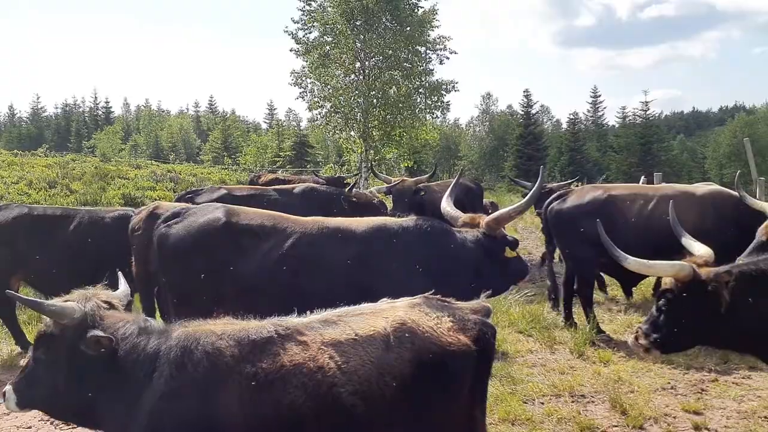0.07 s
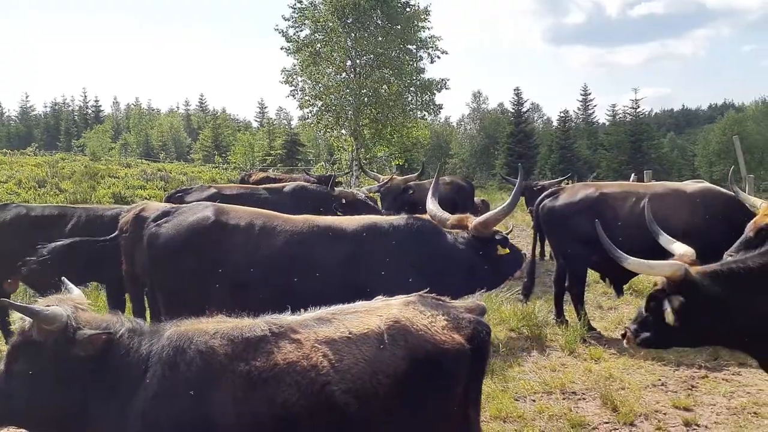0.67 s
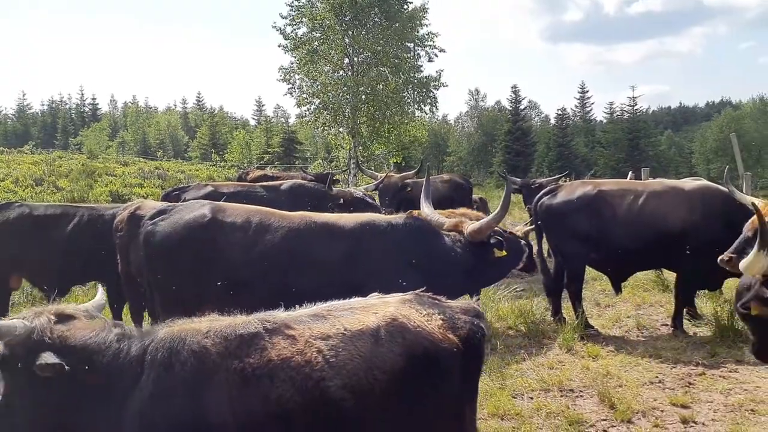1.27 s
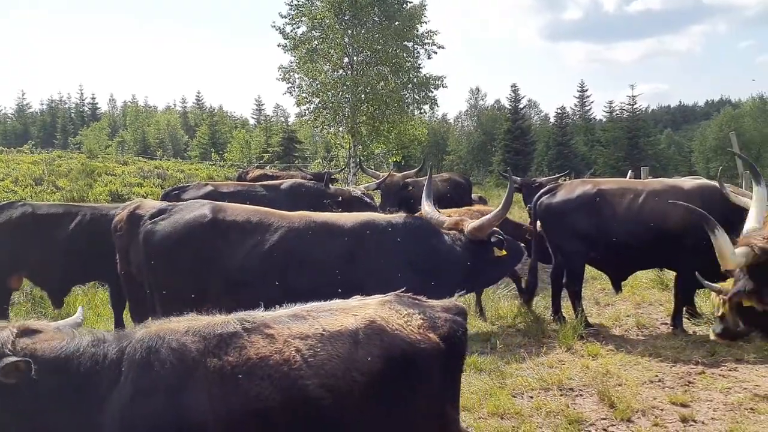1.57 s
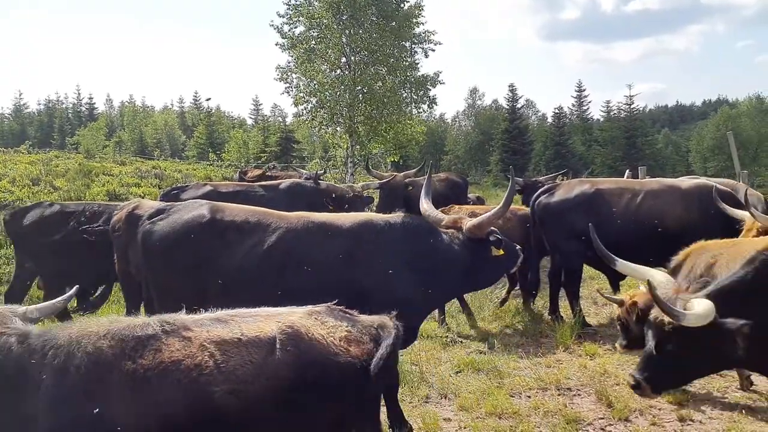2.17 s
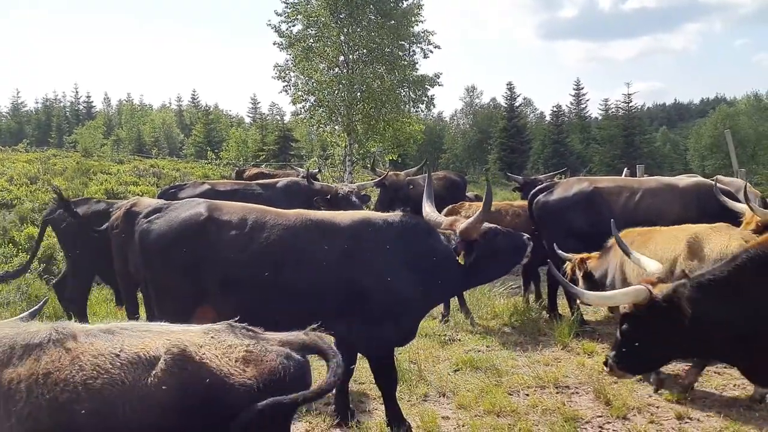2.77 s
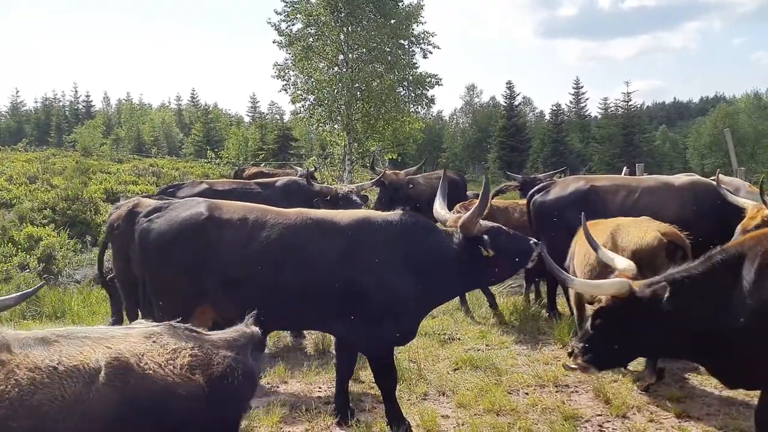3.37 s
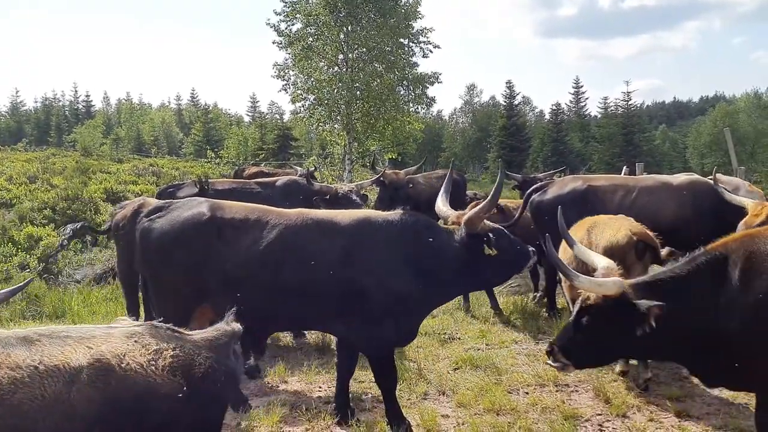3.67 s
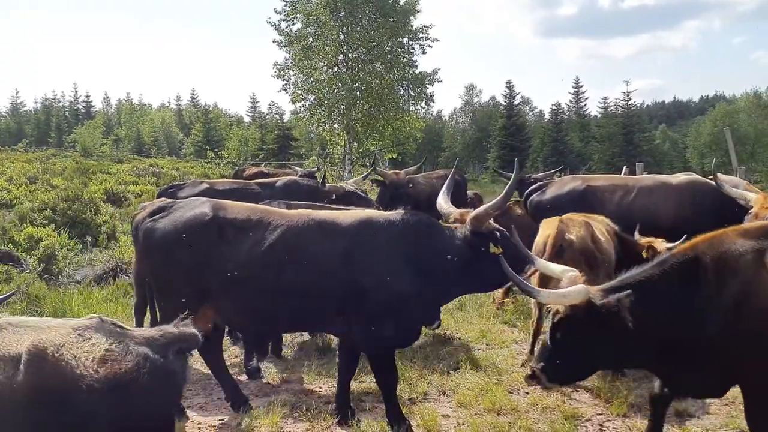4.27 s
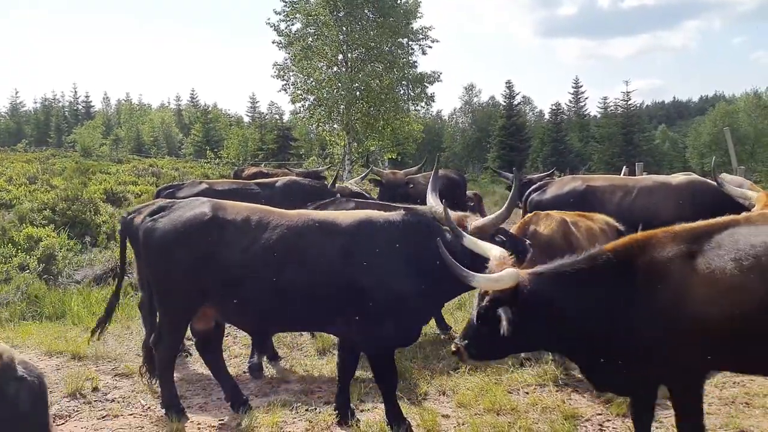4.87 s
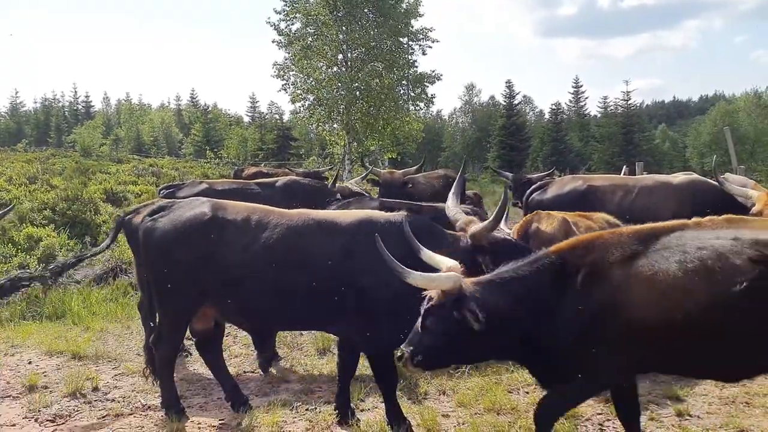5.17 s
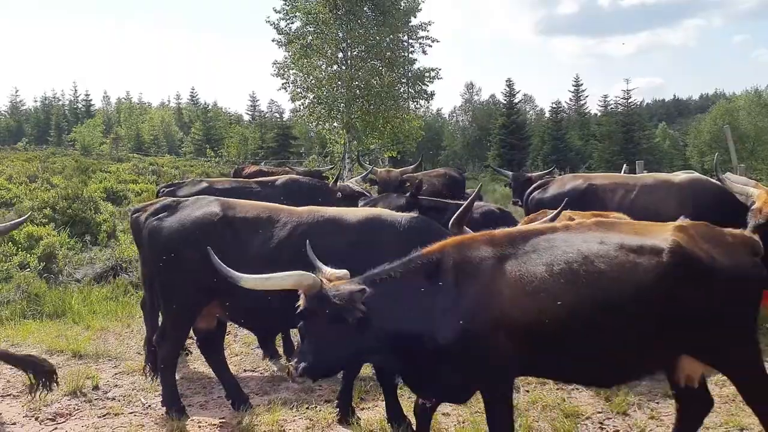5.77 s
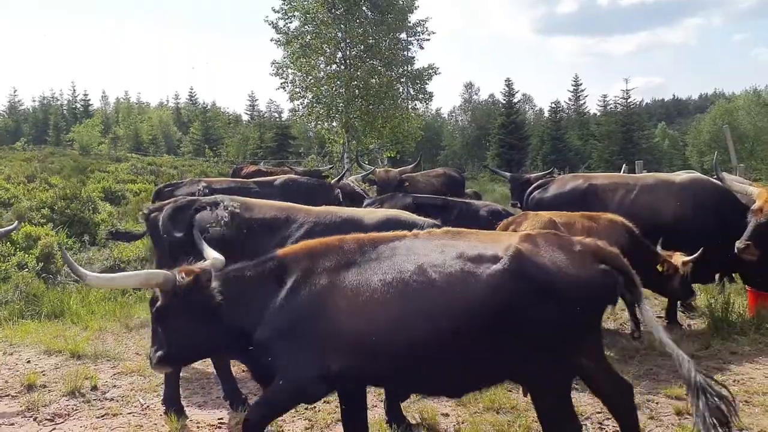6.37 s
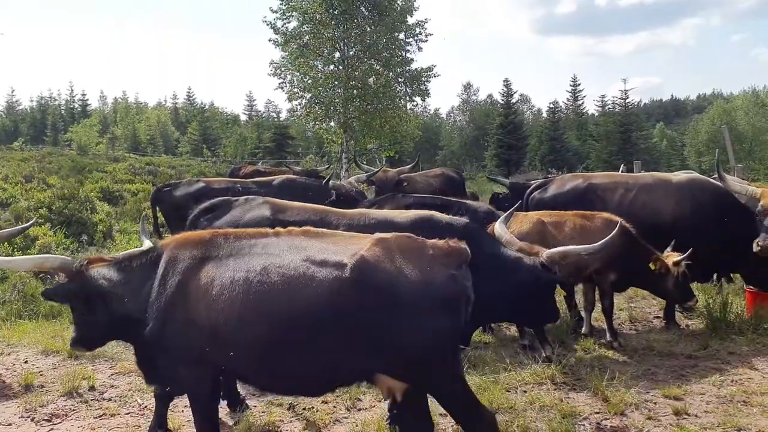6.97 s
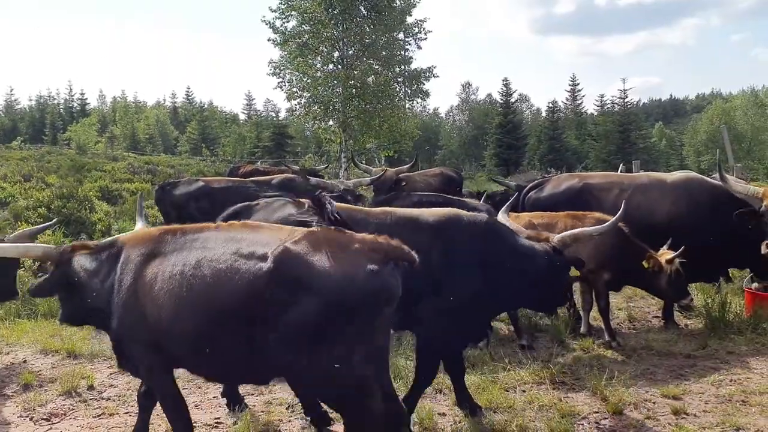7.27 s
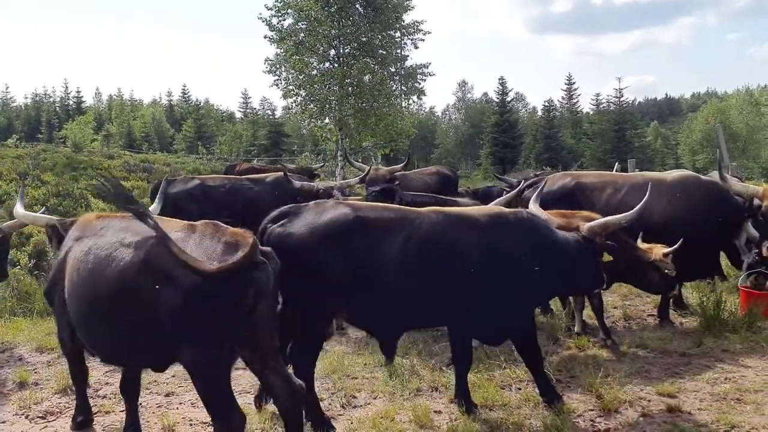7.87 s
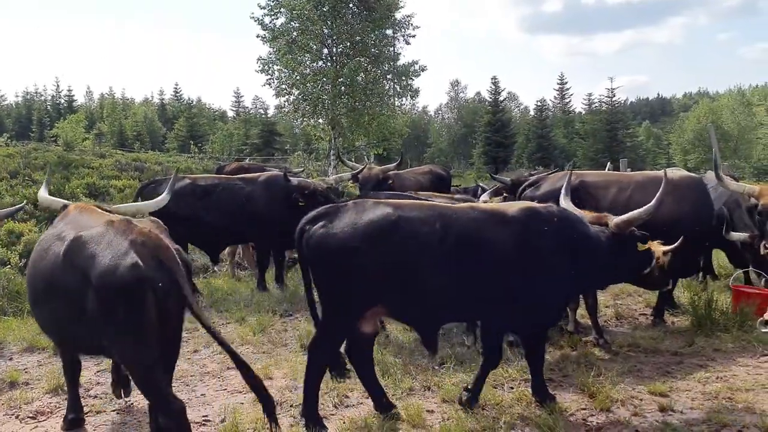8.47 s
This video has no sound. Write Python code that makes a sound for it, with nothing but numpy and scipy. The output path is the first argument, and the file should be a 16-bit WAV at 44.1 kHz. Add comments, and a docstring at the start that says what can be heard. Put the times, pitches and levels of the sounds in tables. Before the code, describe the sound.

Deep bellows and nasal lowing come from cattle standing close by outdoors, mostly to the left of a stereo microphone. The calls overlap and follow each other with short gaps, ending in a higher rising moo and a last bellow. Soft hoof thuds, twig snaps and tails brushing the grass grow more frequent in the second half, while light wind rumbles faintly underneath.

```python
"""Cattle in a forest clearing

A herd mills about close to a hand-held stereo microphone, its left side bright and its right side full in the
bass. One cow bellows four times, her vocal folds ringing nose, mouth and throat. Others low through the nose
with closed mouths, and one opens up into a rising moo. Hooves thud and snap twigs, tails swish, dry grass
rustles and a light wind rumbles at the microphone."""
import sys
import numpy as np
from scipy import signal
from scipy.fft import rfft, irfft, next_fast_len
from scipy.io import wavfile

SR = 44100
rng = np.random.default_rng(int(sys.argv[2]) if len(sys.argv) > 2 else 0)


def dump(signal):
    """Clip the signal to [-1, 1] and save it as 16-bit WAV at the path in sys.argv[1]."""
    limited = np.clip(np.atleast_2d(signal).T, -1, 1)
    pcm = np.round(limited * 32767).astype(np.int16)
    wavfile.write(sys.argv[1], SR, pcm)


N = 380141

# upper resonances of the throat, one spectrum for each bellow: f/Hz, level/dB
THROAT_SPECTRA = [
    [(340, -22.5), (580, 0), (620, 5.5), (663, 3.5), (924, -11), (1170, -0.5), (1420, -5.5), (1540, -6.5),
     (1760, -5), (2130, -7.5), (2370, -32.5), (3400, -12), (4420, -72.5), (7480, -120)],
    [(340, -14), (580, 1), (639, 2), (678, -5), (809, -6), (1020, -14.5), (1190, -6), (1480, -7.5),
     (1550, -13), (2060, -9.5), (2470, -46), (3040, -18.5), (3400, -17), (4420, -54), (7480, -120)],
    [(340, -24), (580, 0), (719, -4.5), (1040, -19), (1210, -3), (1610, -19), (2060, -9), (2370, -32),
     (2910, -8.5), (3400, -17), (4420, -52), (7480, -120)],
    [(340, -12), (580, -8), (634, 4.5), (745, 6), (810, 6), (891, -7), (1050, -18), (1180, -2), (1400, -5),
     (1720, -14), (2160, -14.5), (2440, -40), (3400, -41.5), (4420, -74), (7480, -120)],
]


def amp(db):
    """Turns decibels into a gain."""
    return 10 ** (np.asarray(db) / 20)


def evened(x):
    """Scales a sound to rms 1."""
    return x / np.sqrt(np.mean(abs(x) ** 2) + 1e-20)


def read(points, hz):
    """Reads a spectrum on a log-frequency axis."""
    f, value = np.transpose(points)
    return np.interp(np.log(hz + 1), np.log(f + 1), value)


def level_curve(points):
    """Joins (t/s, level/dB) points into a level for every sample of the scene."""
    return np.interp(np.arange(N) / SR, *np.transpose(points))


def add(mix, s, sound):
    """Mixes a sound in at s seconds."""
    part = mix[max(round(s * SR), 0):][:len(sound)]
    part += sound[:len(part)]


def shaped(x, gain):
    """Filters by a gain that is a function of frequency."""
    size = next_fast_len(x.shape[-1] + 2048)
    return irfft(rfft(x, size) * gain(np.fft.rfftfreq(size, 1 / SR)), size)[..., :x.shape[-1]]


def coloured(x, spectrum):
    """Gives a sound a spectrum with steep skirts, at rms 1."""
    lo, hi = spectrum[0][0], spectrum[-1][0]
    skirts = lambda f: np.minimum(f / lo, 1) ** 2 / np.maximum(f / hi, 1) ** 4
    return evened(shaped(x, lambda f: amp(read(spectrum, f)) * skirts(f)))


def peak(f, hz, width_hz):
    """Gain of a resonance passed twice."""
    return 1 / (1 + (2 * (f - hz) / width_hz) ** 2)


def waver(size, hz):
    """A random drift at rms 1 that changes about hz times a second."""
    at = np.arange(size) * hz / SR
    return evened(np.interp(at, np.arange(4096), rng.standard_normal(4096)))


def swell(size, hz, depth_db):
    """A gain that drifts up and down about hz times a second."""
    gains = amp(depth_db * np.tanh(rng.standard_normal(int(size * hz / SR) + 2)))
    return np.interp(np.arange(size), np.linspace(0, size, len(gains)), gains)


def placed(pair, balance):
    """Shares each frequency between the left and the right side of the microphone."""
    return shaped(pair, lambda f: 2 / (1 + amp(np.array([[-1], [1]]) * read(balance, f))))


def clearing(x, wet_db, t60_s, bass_db):
    """Bodies and the forest edge scatter the sound back, differently to each side."""
    t = np.arange(SR) / SR
    taps = rng.standard_normal((2, SR)) * (rng.random((2, SR)) < 2000 / SR)
    taps *= amp(-60 * t / t60_s) * (t > .003)
    taps /= np.linalg.norm(taps, axis=1, keepdims=True)
    echo = signal.fftconvolve(x[None], taps, axes=1)[:, :N]
    return x + amp(wet_db) * shaped(echo, lambda f: amp(read([(350, bass_db), (1300, 0.0033)], f)))


def wind(gain_db=8):
    """Lumps of light wind rumble at the microphone, partly alike on both sides."""
    # colour of the rumble: f/Hz, level/dB
    spectrum = [(12, -49), (20, -44), (48, -3.5), (96, -1), (117, -11), (140, -14), (189, -16), (225, -22),
                (400, -27), (520, -22), (880, -120)]
    # rise and fall of the wind: t/s, level/dB
    levels = [(0.0, -58), (0.81, -47.5), (1.22, -56), (2.1, -61.5), (3.0, -56), (4.2, -58.5), (5.0, -56.5),
              (5.83, -52), (6.4, -55.5), (7.3, -53), (7.85, -49), (8.62, -51)]
    left, right = rng.standard_normal((2, N))
    rumble = coloured(np.array([left + .5 * right, right]), spectrum)
    lumps = amp(.7 * waver(N, 10))
    return rumble * lumps * amp(gain_db + level_curve(levels))


def crackle(size, per_s):
    """Dry stalks bending: many small clicks of uneven size."""
    sizes = amp(4 * np.minimum(rng.exponential(1, size), 3))
    return (rng.random(size) < per_s / SR) * sizes * rng.choice([-1, 1], size)


def grass(gain_db=5, trample_db=-15):
    """Leaves hiss, and dry grass crackles in clumps under many hooves."""
    # colour of grass and leaves: f/Hz, level/dB
    spectrum = [(200,-22),(380,-19),(500,-11),(640,-3),(1000,-1),(1400,-2),(2200,-9),(2900,-11),(3900,-28),(5100,-13),(6400,-29),(8300,-46),(11500,-35),(15800,-44)]
    # rise and fall of the rustle: t/s, level/dB
    levels = [(0.0, -58), (0.72, -57), (1.03, -56), (1.39, -53), (2.06, -63.5), (2.71, -55), (3.02, -51),
              (3.84, -59.5), (4.34, -57), (4.68, -53), (5.19, -52.5), (6.51, -55.5), (7.75, -54),
              (7.88, -55.5), (8.62, -54.5)]
    # likeness of left and right: f/Hz, coherence/0-1
    coherence = [(60,.6),(300,1),(800,0.85),(1500,0.052),(3000,0.014)]
    left, unrelated = rng.standard_normal((2, N))
    alike = lambda f: np.clip(read(coherence, f), 0, 1)
    right = shaped(left, alike) + shaped(unrelated, lambda f: np.sqrt(1 - alike(f) ** 2))
    stalks = crackle(N, per_s=700) * amp(9 * np.tanh(waver(N, 13)))
    trample = evened(shaped(coloured(stalks, spectrum), lambda f: f / np.hypot(f, 4500)))
    leaves = coloured(np.array([left, right]), spectrum) * amp(1.5 * waver(N, 20))
    return (leaves + amp(trample_db) * trample) * amp(gain_db + level_curve(levels))


def tail_swishes():
    """Tails and legs brush the grass: a dense crackle of blades swells and fades."""
    # strokes through the grass: t/s, length/s, level/dB, brightness/(dB per octave)
    strokes = [(1.447,0.23,-64,6.5),(1.558,.03,-56.5,9),(4.618,.18,-59,4),(5.857,0.068,-56,3),(5.949,.076,-54.5,5),(6.151,0.11,-52.5,0.5),(6.368,0.11,-62.5,5),(6.775,0.061,-55,3.5),(7.025,0.008,-45,16),(7.229,0.081,-52.5,6)]
    # colour of the brushed blades: f/Hz, level/dB
    spectrum = [(1500,-11),(2800,9),(3900,-6.5),(5100,7),(6500,-21),(8500,-29),(11500,-14),(15800,-27.5)]
    mix = np.zeros(N)
    for s, length, db, bright_db in strokes:
        t = np.arange(0, length, 1 / SR)
        blades = coloured(crackle(len(t), per_s=2600) * swell(len(t), 90, 4), spectrum)
        blades = evened(shaped(blades, lambda f: amp(bright_db * np.log2(1 + f))))
        add(mix, s, amp(db) * np.sin(np.pi * t / length) * blades)
    return mix


def knock(db, hz, t60_s, relative_width, rise_s):
    """A short burst of noise around one frequency, with no deep bass under it."""
    t = np.arange(SR // 3) / SR
    band = lambda f: peak(f, hz, relative_width * hz) * np.minimum(2 * f / hz, 1) ** 2
    noise = shaped(rng.standard_normal(len(t)), band)
    burst = noise * amp(-60 * t / t60_s) * (1 - np.exp(-t / rise_s))
    return amp(db) * burst / abs(burst).max()


def twig_snaps(crack_db=-1):
    """Twigs and stalks break underfoot, each with a sharp crack and a brief ring."""
    # breaking twigs: t/s, peak level/dB, centre f/Hz
    snaps = [(0.0453, -41.5, 4740), (0.0901, -45, 4920), (2.808, -41, 3810), (4.0246, -45.5, 4900),
             (4.6294, -41, 4740), (4.727, -43, 3010), (5.096, -44, 5500), (5.5453, -43.5, 4970),
             (5.8398, -31, 5050), (5.8454, -32, 5070), (6.0213, -40, 3080), (6.217, -43, 5080),
             (6.347, -40.5, 4860), (6.8016, -39.5, 4950), (7.0266, -31, 5300), (7.5357, -33.5, 3250),
             (7.5756, -37, 2970)]
    # colour of the instant of breaking: f/Hz, level/dB
    spectrum = [(1200,-6),(2400,20.5),(3900,0.5),(5100,20.5),(6800,-35.5),(8500,-32),(11500,-6.5),(15800,-23)]
    mix = np.zeros(N)
    t = np.arange(2048) / SR
    for s, db, hz in snaps:
        add(mix, s, knock(db, hz, t60_s=0.022, relative_width=0.19, rise_s=0.0016))
        crack = coloured(rng.standard_normal(len(t)) * t * np.exp(-t / 0.0013), spectrum)
        add(mix, s, amp(db + crack_db) * crack / abs(crack).max())
    return mix


def hoof_thuds(decay_cycles=18.8):
    """Hooves land on turf; each thud dies in the same number of cycles, so deep ones last longer."""
    # hoof falls: t/s, peak level/dB, centre f/Hz
    steps = [(1.392,-35,440),(3.543,-26.5,96),(4.146,-37.5,258),(6.152,-40,74),(6.372,-39.5,377),(6.408,-34.5,68.6),(6.728,-35,98),(6.765,-30.5,93)]
    mix = np.zeros(N)
    for s, db, hz in steps:
        add(mix, s, knock(db, hz, t60_s=decay_cycles / hz, relative_width=0.62, rise_s=1 / hz))
    return mix


def roughness(size, held=.17, edge=.62):
    """A voice starts rough, clears, and breaks up again as the call ends."""
    progress = np.linspace(0, 1, size)
    ends = np.exp(-(progress / .15) ** 2) + np.exp(-((1 - progress) / .11) ** 2)
    return held + (edge - held) * ends


def folds(pitch, rough):
    """Cycle count of the vocal folds: a slow quaver, and uneven cycles when the voice is rough."""
    quaver = .003 * waver(len(pitch), 16)
    jitter = (.0014 + .035 * rough ** 1.562) * waver(len(pitch), 70)
    return np.cumsum(pitch * (1 + quaver + jitter)) / SR


def partials(cycles, rough, count=8):
    """The low harmonics, each with its own phase and swell; roughness smears the higher ones most."""
    size, order = len(cycles), np.arange(1, count + 1)[:, None]
    smear = np.array([waver(size, 110) for _ in range(count)])
    swells = np.array([swell(size, 14, 1.5) for _ in range(count)])
    phase = 2 * np.pi * (order * cycles + rng.random((count, 1))) + smear * rough * np.sqrt(order / 2)
    return order, np.sqrt(2) * swells * np.cos(phase)


def cavity(harmonics, weights):
    """Sums the harmonics as a cavity favours them, at an rms near 1."""
    return (harmonics * weights).sum(0) / np.linalg.norm(weights, axis=0)


def rasp(cycles, throat, air_share, overtone_limit):
    """Overtones of the folds and a puff of air in each cycle ring the upper throat."""
    pulses = np.zeros(len(cycles))
    for k in range(4, overtone_limit):
        pulses += np.cos(2 * np.pi * (k * cycles + rng.random() / 2)) * swell(len(cycles), 9, 5)
    puffs = (.5 + np.exp(-(cycles % 1) / 0.5)) * rng.standard_normal(len(cycles))
    # only the air reaches the highest resonance
    hiss = amp(-28) * evened(shaped(puffs, lambda f: peak(f, 5300, 770) ** 2))
    return evened((1 - air_share) * coloured(pulses, throat) + air_share * coloured(puffs, throat)) + hiss


def closed_low(length_s, first_hz, held_hz, last_hz, first_db, last_db, release_s, attack_s=0.069):
    """With the mouth shut most sound leaves by the nose; the pitch slides in, holds and slides off."""
    t = np.arange(0, length_s, 1 / SR)
    progress = t / t[-1]
    slide_in = np.cos(np.pi / 2 * np.minimum(progress / 0.27, 1)) ** 2
    slide_off = np.maximum(1 - (1 - progress) / 0.29, 0) ** 2
    pitch = held_hz + (first_hz - held_hz) * slide_in + (last_hz - held_hz) * slide_off
    envelope = np.minimum(t / attack_s, 1) ** 2 * np.minimum((t[-1] - t) / release_s, 1) ** 2
    rough = roughness(len(t))
    cycles = folds(pitch, rough)
    order, harmonics = partials(cycles, rough)
    chest = amp(-10) * harmonics[0]
    nose = cavity(harmonics, peak(order * pitch, 190, 23))
    leak = amp(-26) * cavity(harmonics, peak(order * pitch, 430, 130))
    throat = amp(-24) * rasp(cycles, THROAT_SPECTRA[0], air_share=.55, overtone_limit=18)
    return amp(first_db + (last_db - first_db) * progress) * envelope * (chest + nose + leak + throat)


def open_call(curve, voicing, spectrum, full_effort_db=-25):
    """Effort drives chest, nose and throat rasp; the mouth resonance sinks as the lips round."""
    times, *columns = np.transpose(curve)
    t = np.arange(times[0], times[-1], 1 / SR)
    pitch, effort_db, mouth_db = (np.interp(t, times, column) for column in columns)
    gape_s, rounding_s, gape_hz, rounded_hz, nose_hz, chest_db, throat_db = voicing
    gape = np.exp(-((t - times[0] - gape_s) / rounding_s) ** 2)
    mouth_hz = rounded_hz + (gape_hz - rounded_hz) * gape
    push_db = effort_db - full_effort_db
    strain_db = 0.37 * push_db + 14.5 * np.log2(pitch / pitch.max())  # more rasp near the top pitch
    rough = roughness(len(t))
    cycles = folds(pitch, rough)
    order, harmonics = partials(cycles, rough)
    chest = amp(chest_db + .65 * push_db) * harmonics[0]
    nose = amp(effort_db + 1) * cavity(harmonics, peak(order * pitch, nose_hz, 40))
    mouth = amp(mouth_db + 1) * cavity(harmonics, peak(order * pitch, mouth_hz, 66) * (order > 2))
    throat = amp(throat_db + strain_db) * rasp(cycles, spectrum, air_share=.24, overtone_limit=34)
    return (chest + nose + mouth + throat) * signal.windows.tukey(len(t), .08)


def cattle():
    """The herd's voices at close range: four bellows, a rising moo and closed-mouth lowing."""
    # one curve for each bellow: t/s, pitch/Hz, effort/dB, mouth level/dB
    bellows = [
        [(0.52, 83.8, -26, -45), (0.594, 80.9, -42, -35.5), (0.686, 87.4, -30, -36.5),
         (0.91, 89.77, -24.5, -41), (1.086, 91.6, -29, -36.5), (1.162, 89.7, -26.5, -41.5),
         (1.192, 88.35, -35, -48.5), (1.208, 87.9, -28.5, -43), (1.286, 80, -37.5, -41),
         (1.38, 73.9, -48, -47.5)],
        [(2.23, 76.1, -41.5, -57.5), (2.294, 80.76, -40.5, -38.5), (2.426, 90.7, -27.5, -43),
         (2.712, 90.97, -23.5, -37.5), (2.79, 92.67, -30.5, -32), (3.104, 90.5, -28, -28),
         (3.178, 88.43, -27.5, -36), (3.502, 77.2, -40, -51.5), (3.564, 71.8, -32.5, -55.5),
         (3.62, 66.3, -56.5, -51)],
        [(4.31, 83.36, -39, -38), (4.366, 83.38, -44, -57.5), (4.464, 80.22, -38, -34),
         (4.616, 81.6, -35, -42.5), (4.832, 83.52, -31.5, -36.5), (5.0, 84.18, -34, -53.5),
         (5.212, 84.67, -32, -56.5), (5.378, 79.6, -30.5, -46.5), (5.482, 78.3, -37, -54),
         (5.52, 76.3, -42, -58)],
        [(7.98, 83.4, -37, -38), (7.99, 84.03, -31, -51.5), (8.082, 83.6, -36.5, -55), (8.114, 85.3, -37, -55),
         (8.258, 90.2, -29, -35), (8.356, 93.5, -25.5, -45), (8.482, 90.2, -29, -48.5), (8.532, 85.0, -36, -39),
         (8.56, 84, -33, -44), (8.61, 79, -39.5, -41.5)],
    ]
    # curve of the moo: same columns
    moo = [(7.46, 93.67, -38, -56), (7.546, 112.4, -23, -52.5), (7.69, 142.5, -36.5, -41),
           (7.772, 153.3, -31.5, -45), (7.848, 142, -37, -36.5), (7.894, 132, -35, -44),
           (7.956, 111.3, -32.5, -46), (8.02, 110, -26, -47.5)]
    # upper resonances of the throat in the moo: f/Hz, level/dB
    moo_throat = [(400, -36), (680, -3.5), (838, 2), (1050, -6), (1340, 2), (1580, -3), (1760, 0.5),
                  (2140, -5.5), (2360, -2), (2600, -8.5), (3400, -18.5), (4420, -45), (7480, -120)]
    # vocal tract in each bellow, then the moo: time to widest gape/s, lip rounding/s, gaping mouth f/Hz,
    # rounded mouth f/Hz, nose f/Hz, chest level/dB and throat level/dB at full effort
    voicings = [(0.048, 0.16, 535, 392, 182, -34, -46.5), (0.033, 0.17, 478, 372, 187, -34, -44),
                (.15, 0.23, 489, 418, 184.3, -36, -46.5), (0.24, 0.23, 470, 385, 200.2, -33, -41),
                (0.28, 0.14, 490, 446, 199, -54, -43.5)]
    # lowing: start t/s, end t/s, first, held and last pitch/Hz, first and last level/dB, release/s
    lows = [(.07, 1.83, 69.05, 97.3, 66.3, -36.5, -33.5, .08),
            (4.24, 6.02, 92.26, 94.3, 100.9, -46, -32.5, 0.21),
            (4.27, 4.8, 81.2, 77.1, 77.6, -39, -36.5, .08),
            (6.96, 7.52, 102.8, 86.86, 108, -43.5, -32.5, .06),
            (7.85, 8.07, 105.2, 99.7, 79.3, -27.5, -32, .08)]
    # balance of the voices at the microphone: f/Hz, left minus right/dB
    balance = [(60, -24.5), (110, -11), (200, -11), (380, 6), (700, 8.5), (1290, 11), (2380, 11),
               (4400, 25), (8120, 31), (15000, -3)]
    herd = np.zeros(N)
    for curve, voicing, spectrum in zip([*bellows, moo], voicings, [*THROAT_SPECTRA, moo_throat]):
        add(herd, curve[0][0], open_call(curve, voicing, spectrum))
    for start, end, *contour in lows:
        add(herd, start, closed_low(end - start, *contour))
    return placed(clearing(herd, wet_db=1.5, t60_s=.16, bass_db=-18), balance)


def scene():
    """Voices, feet, grass and wind as they reach a microphone beside the herd."""
    # balance of all but the voices: f/Hz, left minus right/dB
    balance = [(60,-22),(200,-16),(380,0),(700,9),(1300,15),(2400,13),(4600,27),(8100,11),(15000,13)]
    voices = cattle()
    movement = twig_snaps() + hoof_thuds() + tail_swishes()
    movement = clearing(movement, wet_db=-5, t60_s=0.067, bass_db=-7.5)
    return voices + placed(movement + grass() + wind(), balance)


def record(dry):
    """The recorder cuts off the highest treble."""
    edge_hz = 15850
    lowpass = signal.firwin(511, edge_hz, window=("kaiser", 9), fs=SR)
    return signal.oaconvolve(dry, lowpass[None], "same")


dry = scene()
out = record(dry)
dump(out)
```